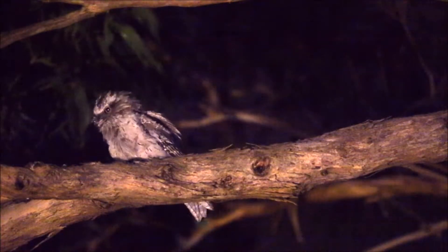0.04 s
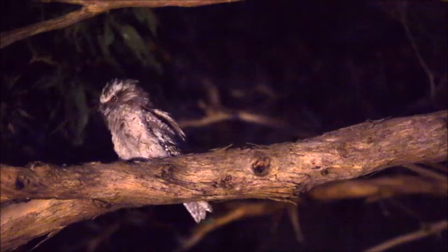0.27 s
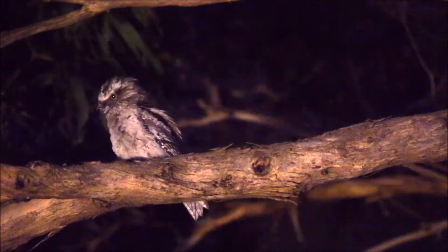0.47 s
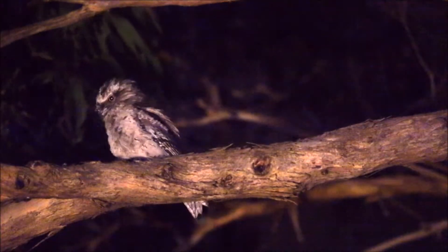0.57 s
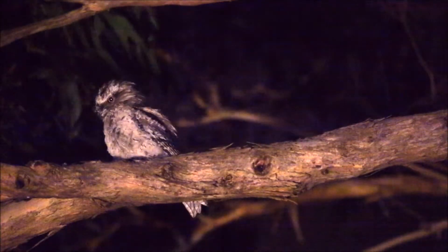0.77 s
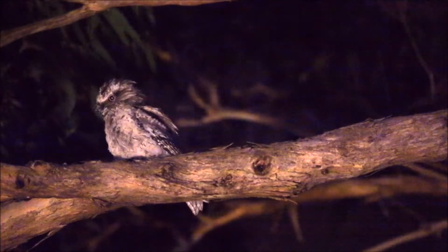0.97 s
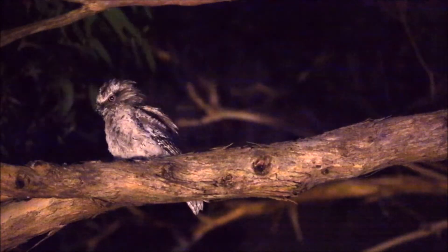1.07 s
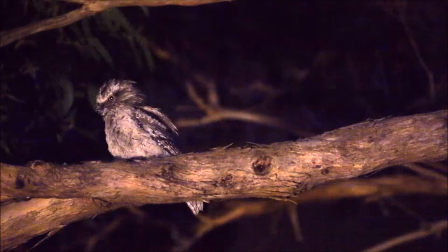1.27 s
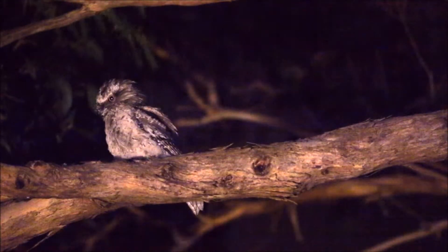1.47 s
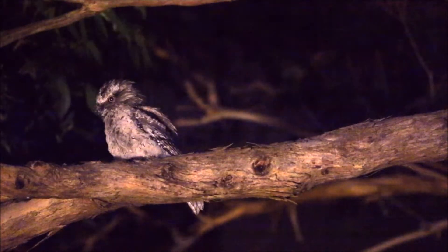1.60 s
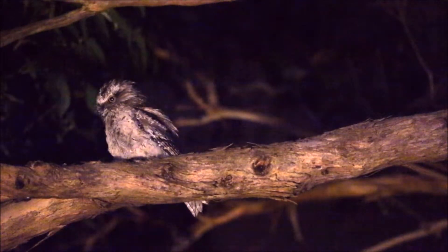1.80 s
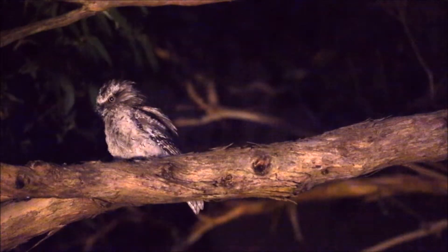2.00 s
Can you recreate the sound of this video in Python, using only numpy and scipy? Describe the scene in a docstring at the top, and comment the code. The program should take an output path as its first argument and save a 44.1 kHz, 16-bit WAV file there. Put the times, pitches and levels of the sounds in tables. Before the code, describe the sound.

One brief, raspy bird squawk sounds from a branch at night, with a slight echo off the trees. Afterwards only quiet background remains: microphone hiss, a far wash and a low rumble dotted with dull bumps.

```python
"""Night: a low distant rumble, a far wash that slowly swells and steady hiss run throughout.
Two faint high pips sound from farther off as a bird on a branch starts one short, hoarse squawk at 0.2 s.
Its voice is led by the third harmonic; puffs of air ring the throat and the opening beak.
The call trails off in a rasp and a thin whistle by 0.6 s, and the trees scatter it back.
From 0.4 s to the end, soft low bumps dot the rumble."""
import sys
import numpy as np
from scipy import signal
from scipy.fft import rfft, irfft
from scipy.io import wavfile

SR = 44100
rng = np.random.default_rng(int(sys.argv[2]) if len(sys.argv) > 2 else 0)


def wav_out(sig):
    """Save sig, one row per channel (or a flat mono array), as 16-bit PCM at SR to the path in sys.argv[1]."""
    wavfile.write(sys.argv[1], SR, np.round(np.clip(np.atleast_2d(sig).T, -1, 1) * 32767).astype(np.int16))


N = 90404
T = np.arange(N) / SR


def amp(db):
    """Decibels to gain."""
    return 10 ** (np.asarray(db) / 20)


def unit(x):
    """Scales to rms 1."""
    return x / np.sqrt(np.mean(x ** 2) + 1e-20)


def curve(table, column=1):
    """One column of a time table, at every sample."""
    rows = np.array(table)
    return np.interp(T, rows[:, 0], rows[:, column])


def colour(x, spectrum):
    """Filters x by rows of (Hz, dB), then scales to rms 1."""
    hz, db = np.transpose(spectrum)
    bins_hz = np.fft.rfftfreq(N, 1 / SR)
    gain = amp(np.interp(np.log(bins_hz + 1), np.log(hz), db))
    return unit(irfft(rfft(x) * gain, N))


def white():
    """White noise."""
    return rng.standard_normal(N)


def wander(hz):
    """Random drift up to a given rate, at rms 1."""
    bins_hz = np.fft.rfftfreq(N, 1 / SR)
    return unit(irfft(rfft(white()) / (1 + (bins_hz / hz) ** 4), N))


def resonate(x, hz, width_hz):
    """Steep resonance: one band-pass applied twice."""
    b, a = signal.iirpeak(hz, hz / width_hz, SR)
    return signal.lfilter(b, a, signal.lfilter(b, a, x))


def blip(centre_s, hz, half_s, peak_db):
    """Brief tone under a bell-shaped envelope."""
    envelope = amp(peak_db) * np.exp(-((T - centre_s) / half_s) ** 2)
    return envelope * np.sin(2 * np.pi * hz * (centre_s - T))


# Rumble spectrum. Each row: frequency in Hz, relative level in dB.
RUMBLE_SPECTRUM = [(15, -36), (28, -21), (50, -12.5), (100, -8), (140, -3.5), (215, -2), (300, -6),
                   (400, -14), (700, -32.5), (2000, -54)]
def rumble():
    """Lumpy distant rumble that slowly grows."""
    start_db, rise_db_per_s, wobble_db = -51.5, 2, 0.5
    noise = colour(white(), RUMBLE_SPECTRUM)
    return noise * amp(start_db + rise_db_per_s * T + wobble_db * wander(hz=21.6))


# Wash spectrum. Each row: frequency in Hz, relative level in dB.
WASH_SPECTRUM = [(100, -33), (350, 0), (600, -2), (900, -2), (1400, -6.5), (2000, -10.5), (2800, -13.5),
                 (3200, -11), (3550, -7), (3850, -12), (4400, -20.5), (6000, -25.5), (16000, -42)]
# Swell of its lower part. Each row: time in seconds, gain in dB.
SWELL = [(0, -0.5), (.6, -2.5), (1.0, 0), (1.3, 0), (1.55, 1), (1.85, -0.5), (2.05, 0)]
def wash():
    """Far outdoor noise whose lower part swells."""
    level_db, swell_top_hz = -51, 2040
    air = colour(white(), WASH_SPECTRUM)
    low = signal.sosfiltfilt(signal.butter(2, swell_top_hz, fs=SR, output="sos"), air)
    high = air - low
    return amp(level_db) * (high + low * amp(curve(SWELL)))


# Hiss spectrum. Each row: frequency in Hz, relative level in dB.
HISS_SPECTRUM = [(20, 8), (250, -3.5), (500, 4), (1300, -3.5), (3000, -1), (4500, 0), (9000, 1),
                 (16000, -1)]
def hiss():
    """Microphone hiss, mostly unrelated between the channels."""
    level_db, shared_power = -58, 0.13
    shared = np.sqrt(shared_power) * white()
    channels = [shared + np.sqrt(1 - shared_power) * white() for _ in range(2)]
    return amp(level_db) * np.array([colour(noise, HISS_SPECTRUM) for noise in channels])


# Voiced call. Each row: time in seconds, pitch in Hz, third harmonic in dB, other harmonics in dB.
VOICE_TRACK = [(.18, 390.7, -88, -90), (.212, 382.3, -54, -55), (.232, 374, -40, -45),
               (.243, 364.1, -31, -46), (.264, 353.1, -24, -37), (.271, 358, -43, -30.5),
               (.279, 350.9, -29, -33.5), (.293, 339.7, -23, -34), (.302, 349.3, -29, -43),
               (.312, 352.6, -23.5, -37), (.319, 370, -22.5, -36), (.325, 360.7, -48, -40),
               (.333, 359.5, -26, -42), (.347, 361.3, -50, -42), (.357, 362, -31, -54),
               (.385, 355, -69, -46), (.44, 357, -110, -110)]
# The other harmonics. Each row: multiple of the pitch, relative level in dB.
OTHER_HARMONICS = [(2, -7), (4, 3), (5, -14), (6, -30.5), (7, -12.5), (8, -16), (9, -15)]
# Air through the throat, faint before the call. Each row: time in seconds, body in dB, treble in dB.
RASP_TRACK = [(0, -54, -83), (.04, -56.5, -79), (.07, -68, -89), (.135, -64, -85), (.175, -51, -70),
              (.203, -58, -71), (.222, -36.5, -66), (.245, -40.5, -55), (.268, -29, -43), (.3, -30.5, -44),
              (.34, -33.5, -46.5), (.4, -42.5, -52.5), (.445, -40.5, -54), (.485, -47, -69),
              (.52, -69, -78), (.58, -110, -110)]
# Throat resonances. Each row: centre in Hz, width in Hz, relative gain in dB.
THROAT_MODES = [(820, 100, -8.5), (975, 72, -3), (1026, 105, -5), (1201, 68, 0.5), (1390, 200, -2),
                (1713, 100, -9.5), (2020, 164, -19)]
# Treble of the rasp. Each row: frequency in Hz, relative level in dB.
TREBLE_SPECTRUM = [(900, -40), (1700, -9), (2150, 1.5), (2700, -1), (3350, 2), (3750, -7.5), (4300, -19),
                   (6000, -29)]
def squawk():
    """Hoarse voice led by its third harmonic, with puffs of air that ring the throat."""
    jitter, shimmer, smear_rad = 0.0086, 0.15, 0.18
    puff_share, puff_decay_cycles = 0.33, 0.11
    pitch_hz = curve(VOICE_TRACK) * (1 + jitter * wander(hz=149))
    cycles = np.cumsum(pitch_hz) / SR
    lead = np.cos(2 * np.pi * 3 * cycles) * (1 + shimmer * wander(hz=130))
    others = np.zeros(N)
    for k, db in OTHER_HARMONICS:
        phase = 2 * np.pi * (k * cycles + rng.random())
        others += amp(db) * np.cos(phase + k * smear_rad * wander(hz=70.5))
    voice = unit(lead) * amp(curve(VOICE_TRACK, column=2))
    voice += unit(others) * amp(curve(VOICE_TRACK, column=3))

    pulse = np.exp(-(cycles % 1) / puff_decay_cycles)  # one puff per pitch cycle
    puffs = white() * (1 - puff_share + puff_share * pulse)
    throat = sum(amp(db) * resonate(puffs, hz, width_hz) for hz, width_hz, db in THROAT_MODES)
    rasp_body = unit(throat) * amp(curve(RASP_TRACK))
    rasp_treble = colour(puffs, TREBLE_SPECTRUM) * amp(curve(RASP_TRACK, column=2))
    return voice + rasp_body + rasp_treble


def trees(call):
    """Sparse reflections from trunks and leaves that die quickly."""
    level_db, t60_s, delay_s, echoes_per_s = -13.5, 0.33, 0.012, 1500
    taps = white() * (rng.random(N) < echoes_per_s / SR)
    taps *= (T > delay_s) * amp(-60 * T / t60_s)
    return amp(level_db) * signal.fftconvolve(call, taps / np.linalg.norm(taps))[:N]


# High pips. Each row: centre in seconds, pitch in Hz, half length in seconds, peak in dB.
FAR_PIPS = [(.15, 5450, 0.0034, -59), (.208, 5500, 0.0042, -58)]
def pips():
    """Two faint, high pips from farther off."""
    return sum(blip(*row) for row in FAR_PIPS)


# Beak resonance. Each row: time in seconds, centre in Hz, level in dB.
BEAK_TRACK = [(.2, 2050, -90), (.228, 2103, -56), (.24, 2146, -43), (.258, 2305, -49.5), (.275, 2650, -47),
              (.3, 2447, -57), (.34, 2145, -52), (.385, 2046, -51), (.425, 1992, -52.5), (.47, 1736, -52),
              (.5, 1500, -63), (.54, 1400, -100)]
def beak():
    """Air rings a resonance that rises as the beak opens and sinks as it shuts."""
    width_hz = 540
    phase = 2 * np.pi * np.cumsum(curve(BEAK_TRACK)) / SR
    ring = wander(width_hz / 2) * np.cos(phase) + wander(width_hz / 2) * np.sin(phase)
    return unit(ring) * amp(curve(BEAK_TRACK, column=2))


# Low bumps. Each row: centre in seconds, pitch in Hz, half length in seconds, peak in dB.
LOW_BUMPS = [(.388, 190, 0.017, -45), (.6, 216, 0.025, -48), (.72, 225, 0.03, -48.5),
             (.8, 135.4, 0.023, -40.5), (.978, 230, 0.005, -37.5), (1.0368, 203, 0.0024, -29),
             (1.598, 142, 0.024, -41), (1.787, 245, 0.02, -39), (1.855, 172, 0.014, -39),
             (2.022, 196, 0.0082, -37)]
def bumps():
    """Soft, dull bumps of bass."""
    return sum(blip(*row) for row in LOW_BUMPS)


# Whistle that ends the call. Each row: time in seconds, pitch in Hz, level in dB.
WHISTLE_TRACK = [(.45, 1240, -100), (.478, 1271, -50), (.503, 1203, -44), (.528, 1187, -54),
                 (.57, 1206, -110)]
def whistle():
    """Faint wavering whistle as the throat closes."""
    jitter = 0.0083
    pitch_hz = curve(WHISTLE_TRACK) * (1 + jitter * wander(hz=120))
    cycles = np.cumsum(pitch_hz) / SR
    return np.sin(2 * np.pi * cycles) * amp(curve(WHISTLE_TRACK, column=2))


def scene():
    """Bird and background in the centre, hiss all around."""
    call = squawk() + beak() + whistle()
    return call + trees(call) + rumble() + bumps() + pips() + wash() + hiss()


def record(dry):
    """Steep low-pass band limit."""
    edge_hz = 15900
    lowpass = signal.firwin(511, edge_hz, window=("kaiser", 9), fs=SR)
    return signal.oaconvolve(dry, lowpass[None], "same")


dry = scene()
out = record(dry)
wav_out(out)
```